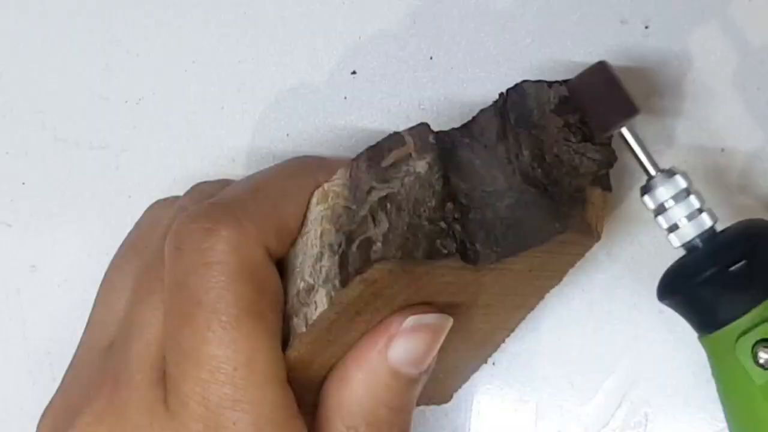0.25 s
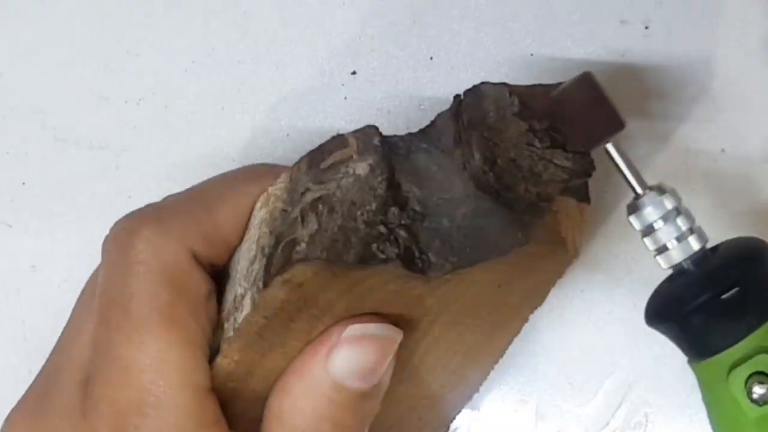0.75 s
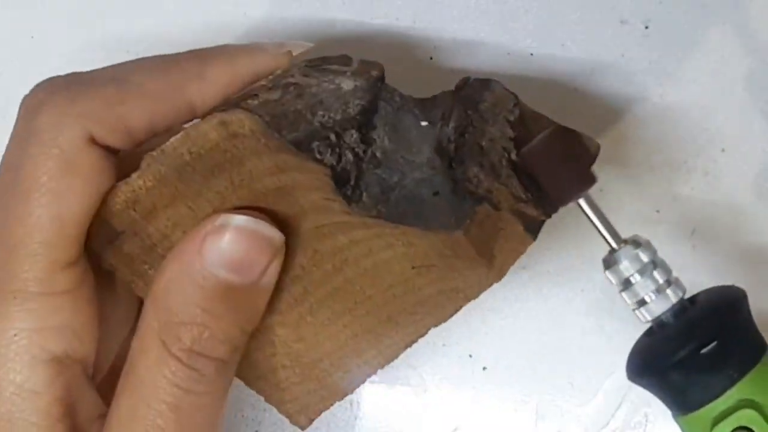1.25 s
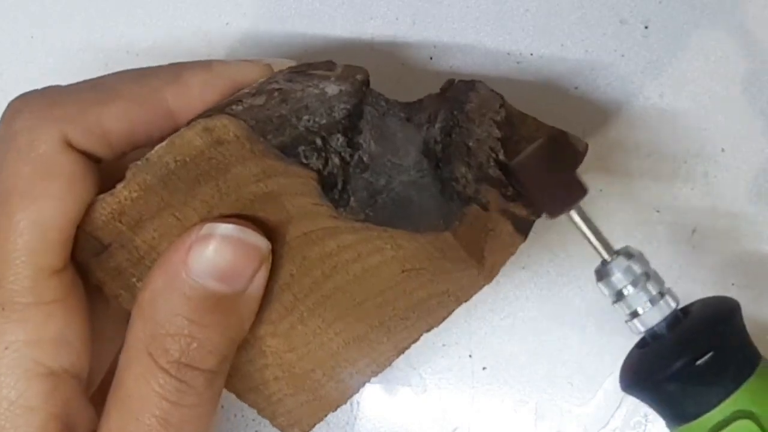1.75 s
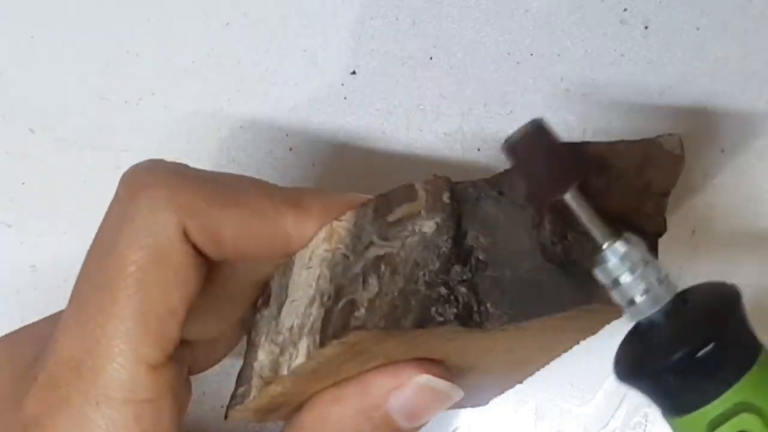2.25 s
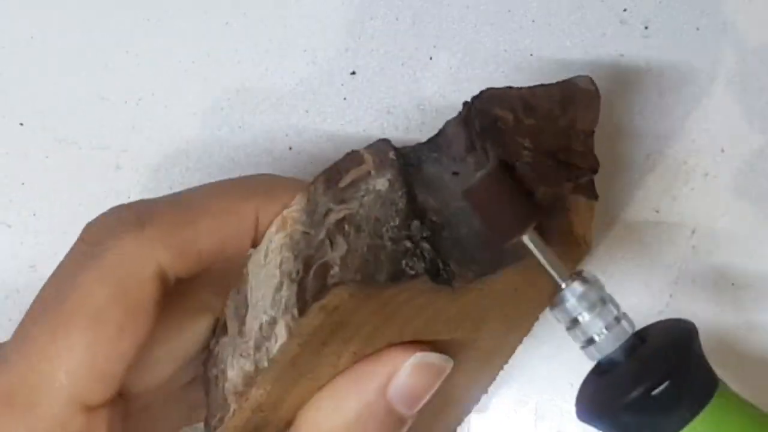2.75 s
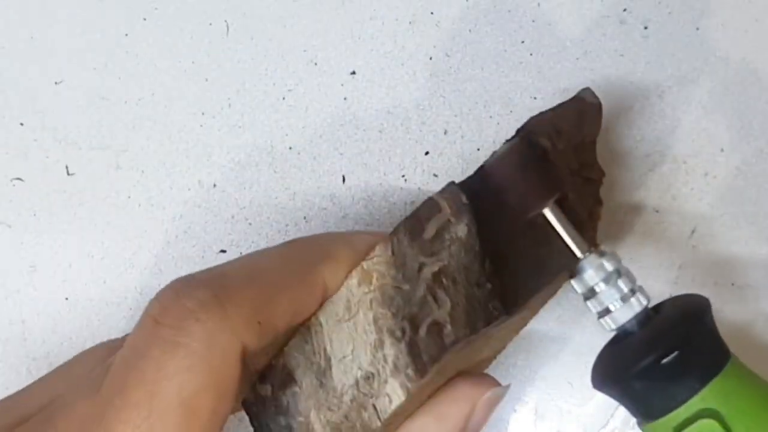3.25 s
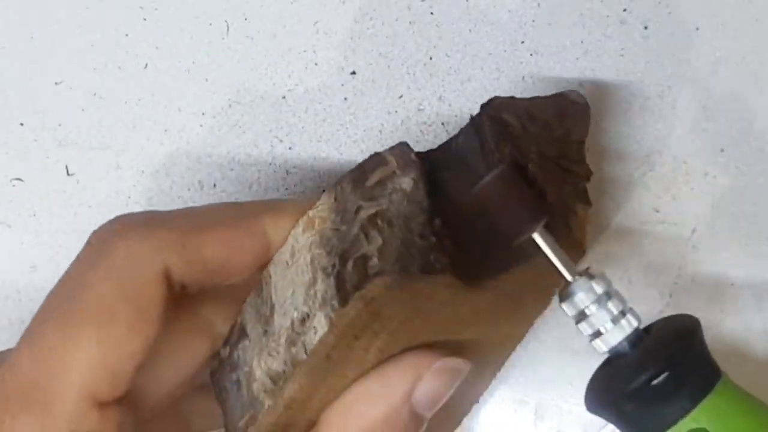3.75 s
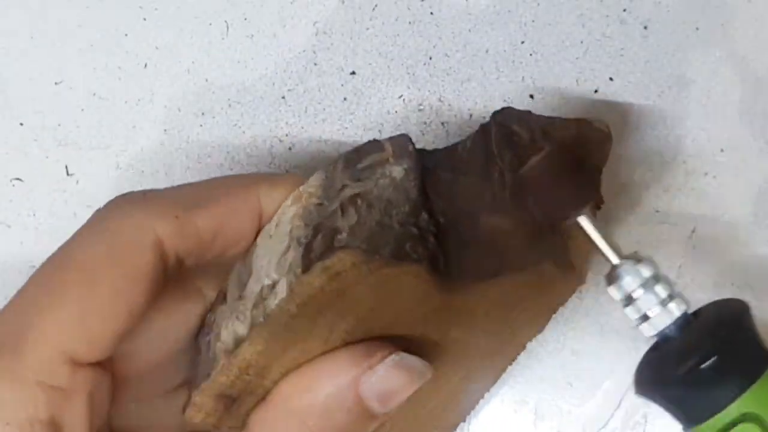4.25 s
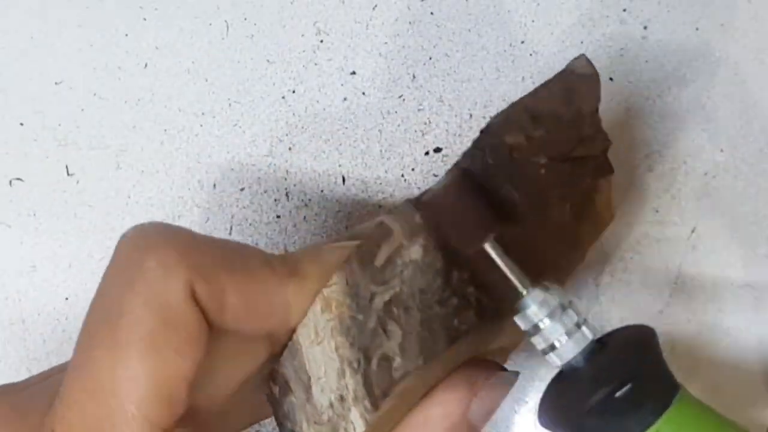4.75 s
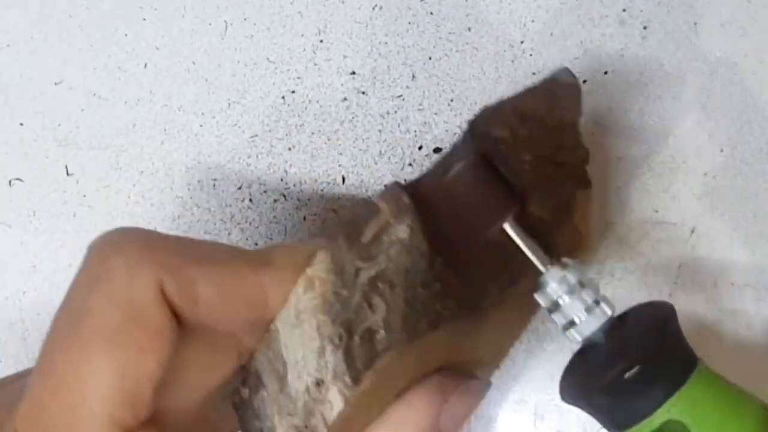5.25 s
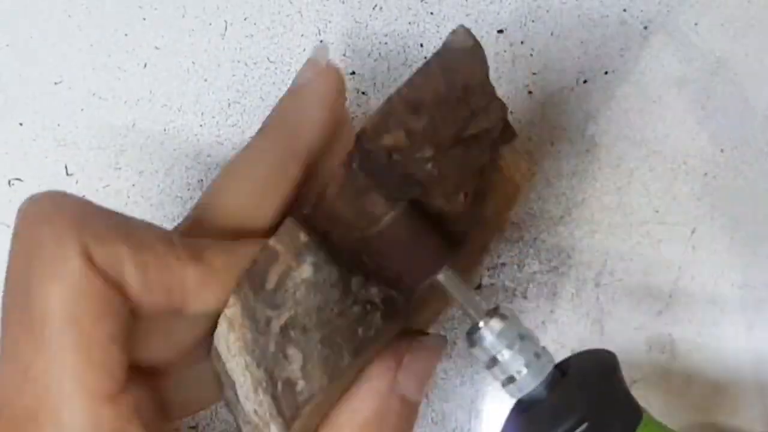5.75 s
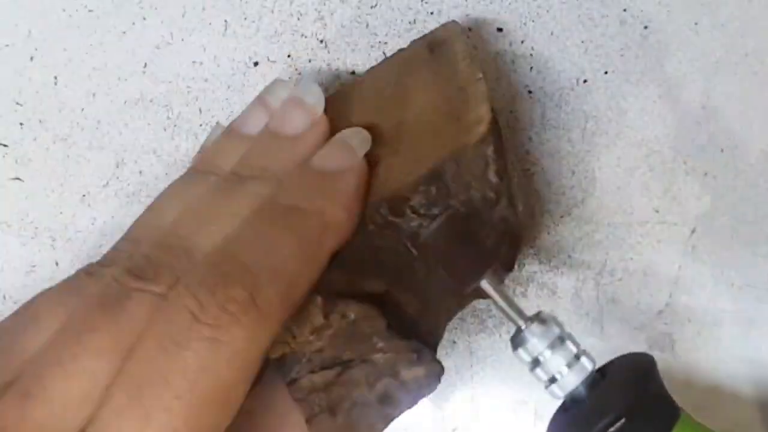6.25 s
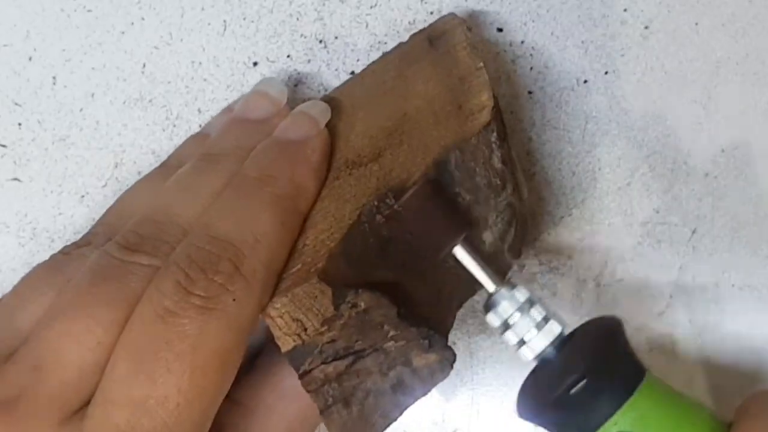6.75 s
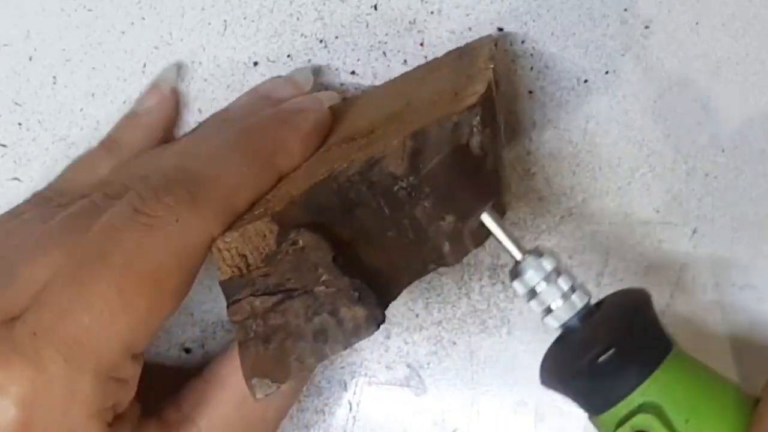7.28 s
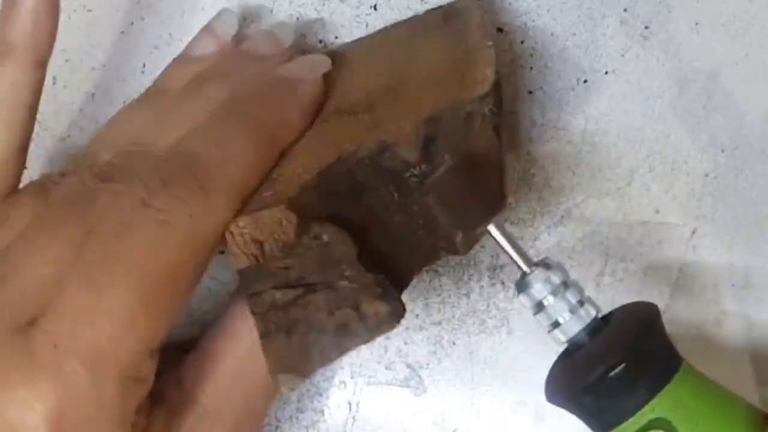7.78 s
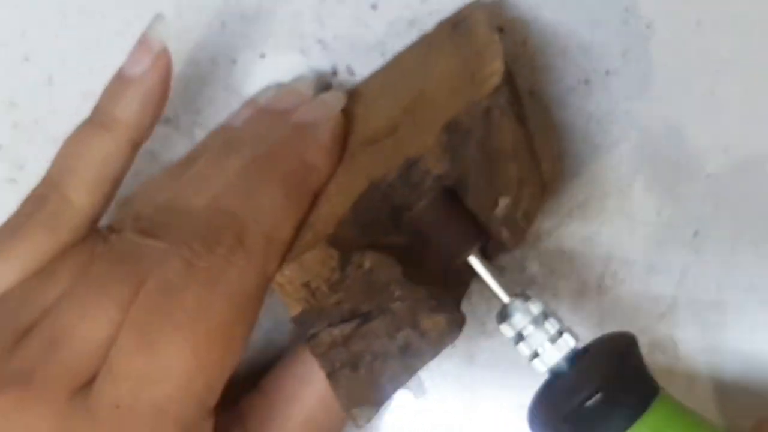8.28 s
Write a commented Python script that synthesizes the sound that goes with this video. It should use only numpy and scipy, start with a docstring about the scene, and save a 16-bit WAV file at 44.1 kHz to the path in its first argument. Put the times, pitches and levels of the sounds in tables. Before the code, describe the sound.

Silence until about 0.28 s, then a handheld rotary tool cuts in abruptly, already spinning and sanding a wood block close to a stereo microphone in a quiet room. A steady midrange hum near 560 Hz carries stacked harmonics, a buzzing chatter three times higher and a piercing whine near 10 kHz, over dry woody rasp and fine hiss. Pitch sags slightly under pressure. Quick skips break the chatter around 1.0-1.7 s, with tiny squeaks near 1.1-1.5. A rough buzz scrapes at 2.9, and stutters cluster from 3.0 to 3.7. Small high squeaks come at 3.9-4.2, then a brief dip at 4.3. Heavier grinding flutters from 4.5 to 5.5. Pressure eases around 5.6-6.4, the hum clearer and slightly higher. From 6.6 it bites again, with faint low block rumble and more skips, sagging lowest at 8.5 s, still running.

```python
"""A handheld rotary tool grinds wood with a small sanding drum, close to the microphone in a quiet room.
Lines locked to the shaft make its hum, which sags under load, the bearing's song and the motor's high whine.
The drum chatters three times a turn, skips off the wood in bouts, and rasps as noise surging once a turn.
It squeaks and buzzes where the grain catches it; the held block rings and rumbles over a low room murmur."""
import sys
import numpy as np
from scipy import signal
from scipy.fft import rfft, irfft
from scipy.io import wavfile
from scipy.ndimage import uniform_filter1d, map_coordinates

SR = 44100
rng = np.random.default_rng(int(sys.argv[2]) if len(sys.argv) > 2 else 0)


def file_out(sig):
    """Save sig as 16-bit WAV at sys.argv[1]."""
    # one column per channel
    cols = np.atleast_2d(sig).T
    # limit, then scale
    lim = np.clip(cols, -1, 1)
    pcm = np.round(lim * 32767).astype(np.int16)
    wavfile.write(sys.argv[1], SR, pcm)


N = 375732
TIME = np.arange(N) / SR  # s
BINS = np.fft.rfftfreq(N, 1 / SR)  # Hz
FREE_HZ, LOADED_HZ = 574, 569  # shaft speeds where load begins and is full


# Shaft speed under changing pressure: time_s [s], speed_hz [turns/s]
SHAFT_SPEED = [(0.3, 570.8), (0.82, 555.0), (1.25, 563.8), (1.67, 553.8), (1.78, 566.5), (2.08, 562.0),
               (2.32, 567.6), (2.67, 556.5), (2.83, 568.1), (2.98, 560.0), (3.21, 561.8), (3.72, 552.8),
               (4.26, 556.5), (4.29, 549), (4.32, 558), (4.38, 565.8), (4.8, 549.0), (5.47, 552.4),
               (5.59, 566.9), (5.96, 573.6), (6.47, 569.4), (6.71, 555.4), (7.02, 552.4), (7.77, 558.4),
               (7.87, 567.9), (8.11, 551.4), (8.5, 542.7)]
RACE_HZ, RACE_SETTLE_S = 3.3, 0.082  # scale of the speed change, averaging window


def shaft(lifted):
    """Torque balance: pressure slows the shaft, and it races a little where the drum is lifted."""
    speed, = follow(SHAFT_SPEED)
    load = np.clip((FREE_HZ - speed) / max(FREE_HZ - LOADED_HZ, 1), 0, 1)
    # subtracting the local mean leaves the shaft slightly slower on both sides of a skip
    race = lifted - uniform_filter1d(lifted, max(round(RACE_SETTLE_S * SR), 1))
    turns = np.cumsum(speed + RACE_HZ * race + 0.696 * wander(15.0)) / SR
    return turns, speed, load


# Level curves of the shaft harmonics at orders 1, 2 and 4: time_s [s], level_db [dB, nominal]
HUM = [(0.3, -36.5), (0.54, -42), (1.42, -40), (1.48, -44), (1.82, -38.5), (2.02, -41.5), (2.82, -37.5),
       (3.26, -37.5), (4.26, -42), (4.34, -39.5), (4.9, -38.5), (5.02, -41.6), (5.5, -40), (5.66, -36),
       (5.88, -33), (5.98, -38.5), (6.22, -32), (6.95, -38), (7.03, -37.5), (7.13, -41), (7.18, -35),
       (7.33, -44.5), (7.44, -37.5), (7.82, -35.5), (7.98, -35), (8.07, -43), (8.16, -43), (8.38, -33.5),
       (8.46, -42), (8.5, -51)]
SECOND = [(0.3, -42.5), (0.5, -40.5), (1.02, -48.5), (1.24, -45), (1.4, -51), (1.98, -41), (2.58, -46.5),
          (2.82, -46), (3.72, -49), (4.14, -43), (4.3, -44), (4.38, -43), (4.74, -47.5), (5.1, -44.5),
          (5.5, -47), (5.84, -44), (6.0, -38), (6.54, -38.5), (6.64, -44.5), (7.04, -53), (7.34, -41),
          (7.9, -41), (8.16, -52.5), (8.38, -39.5), (8.5, -51)]
FOURTH = [(0.3, -41.5), (0.85, -48), (1.18, -42.5), (1.65, -43.5), (1.96, -37), (2.2, -41), (2.45, -38),
          (2.66, -45), (2.8, -40), (3.1, -43.5), (3.7, -49.5), (4.05, -43.5), (4.28, -44.5), (4.4, -37.5),
          (4.8, -55), (5.5, -52), (5.58, -38), (5.9, -33.5), (6.44, -41.5), (6.64, -52), (6.84, -44),
          (7.55, -38), (7.85, -42), (8.5, -53)]
# The same at orders 5, 8 and 9: time_s [s], level_db [dB, nominal]
FIFTH = [(.3, -55), (.6, -50), (1.3, -54), (1.8, -52), (1.98, -46), (2.2, -52.5), (5.4, -53), (6.0, -44),
         (6.8, -50), (7.9, -49.5), (8.5, -56)]
EIGHTH = [(.3, -43), (.95, -46), (1.08, -58), (1.4, -47), (1.7, -56), (4.4, -57), (4.9, -50), (5.3, -55),
          (5.85, -47.5), (6.3, -55), (6.7, -48), (7.1, -53), (8.2, -54), (8.35, -46), (8.5, -57)]
NINTH = [(.3, -50), (.55, -49.5), (1.2, -56), (2.8, -55.5), (3.3, -51), (3.6, -60), (4.8, -55), (5.2, -61),
         (6.04, -51.5), (7.9, -52.5), (8.5, -61)]
# Weaker shaft harmonics: order [lines per turn], level_db [dB, nominal]
OVERTONES = [(6, -54), (7, -53), (10, -56.5), (11, -57.5), (12, -58), (13, -54), (17, -56), (19, -58),
             (20, -57), (21, -56)]
# Bearing tones and sidebands: order [cycles per turn], free_db [dB, nominal], loaded_db [dB, nominal]
BEARING = [(2.58, -60, -47), (2.82, -68, -57), (3.58, -51, -59), (4.16, -68, -55), (4.58, -54, -54.5),
           (5.58, -54, -57.5), (6.16, -51, -59), (6.58, -60, -55.5), (7.43, -58, -57), (7.58, -57, -60)]
SWELL_DB_PER_ORDER, SWELL_MAX_DB = 0.35, 2.6
DRIFT_PER_ORDER, DRIFT_MAX = 0.074, 0.78  # radians
DIP_S, DIP_LENGTH_S, DIP_DB = 4.285, 0.044, -8  # these tones dip briefly


def motor(turns, load):
    """Rotating unbalance gives a hum and harmonics, bearing tones lie between; contact makes them tremble."""
    tremble_db = 1 + 3.86 * load
    shaken = turns + .008 * load * wander(15)
    hum_db = follow(HUM)[0] + 0.22 * tremble_db * wander(27.3)
    out = tone(shaken, 1, hum_db, drift=0.088)
    for order, curve in (2, SECOND), (4, FOURTH), (5, FIFTH), (8, EIGHTH), (9, NINTH):
        level_db = follow(curve)[0] + 0.45 * tremble_db * wander(20) - .3
        out += tone(turns, order, level_db, drift=.05 * order)
    bearing = [(order, free_db + (loaded_db - free_db) * load) for order, free_db, loaded_db in BEARING]
    for order, level_db in OVERTONES + bearing:
        slow_depth_db = min(SWELL_DB_PER_ORDER * order, SWELL_MAX_DB)
        swell_db = 2.6 * wander(30) + slow_depth_db * wander(2.9) - 2
        out += tone(turns, order, level_db + swell_db, drift=min(DRIFT_PER_ORDER * order, DRIFT_MAX))
    return out * amp(DIP_DB * bump(TIME, DIP_S, DIP_LENGTH_S))


# Level curve of the high motor whine: time_s [s], level_db [dB, nominal]
WHINE = [(0.3, -35), (0.46, -42), (0.66, -46), (0.78, -49), (1.06, -36.5), (1.18, -48), (1.66, -39.5),
         (1.74, -41.5), (2.42, -36), (3.18, -46), (3.34, -43), (3.54, -47.5), (4.34, -42), (4.46, -50),
         (4.7, -43), (5.18, -35.5), (5.42, -43), (5.74, -36), (6.06, -46), (6.3, -39.5), (6.74, -43),
         (7.26, -40), (7.62, -53), (7.82, -41), (8.02, -43), (8.5, -45)]
WHINE_ORDER = 18  # cycles per turn
FLIP_HZ, FLIP_WIDTH_HZ, FLIP_RADIANS = 558.5, 4, 2.3  # shaft speed, half-width, added phase lead


def whine(turns, speed, load):
    """Shaft-locked line: flickers more under load, and near one speed reaches the ports out of step."""
    flicker_db = (0.47 + 2.2 * load) * np.tanh(wander(31, centre_hz=23.4))
    swing_db = 7.6 * np.tanh(0.52 * wander(19))
    lead = FLIP_RADIANS * bump(speed, FLIP_HZ, 2 * FLIP_WIDTH_HZ)
    level_db = follow(WHINE)[0] + flicker_db + swing_db - 1.1
    return tone(turns, WHINE_ORDER, level_db, drift=0.77, lead=lead)


# Moments when the drum skips off the wood: middle_s [s], length_s [s]
SKIPS = [(1.023, .05), (1.133, .014), (1.299, .019), (1.344, .021), (1.4, .03), (1.64, .04), (2.997, .025),
         (3.041, .018), (3.21, .012), (3.301, .012), (3.353, .019), (3.401, .02), (3.443, .022),
         (3.48, .017), (3.601, .016), (3.656, .016), (3.704, .018), (4.359, .022), (4.415, .025),
         (4.558, .012), (4.915, .026), (4.974, .016), (5.0, .011), (5.075, .012), (5.166, .014),
         (5.242, .018), (5.312, .024), (5.361, .02), (5.425, .012), (5.476, .019), (5.624, .018),
         (5.806, .014), (6.447, .024), (6.52, .022), (7.244, .02), (7.357, .018), (7.4, .019), (7.8, .03),
         (7.845, .022), (8.212, .028), (8.289, .029), (8.33, .016), (8.404, .013)]
SKIP_DB, SKIP_EDGE = -19, 2.0  # limit of the drop, steepness of its saturation


def skipping():
    """Intermittent contact: the chatter drops abruptly, with saturation squaring off each drop."""
    skip_db = SKIP_DB * np.tanh(SKIP_EDGE * sum(bump(TIME, s, length) for s, length in SKIPS))
    return skip_db, 1 - amp(skip_db)


# Level curve of the drum's knocking on the wood: time_s [s], level_db [dB, nominal]
CHATTER = [(0.3, -43.5), (0.62, -40.5), (0.76, -33.5), (0.97, -36), (1.05, -40.5), (1.36, -38), (1.48, -35),
           (1.68, -41.5), (2.35, -46.5), (2.6, -41), (2.69, -46), (2.94, -37.5), (3.19, -47), (3.39, -36.5),
           (3.58, -38), (3.68, -45), (3.75, -40.5), (4.24, -39.5), (4.35, -46), (4.5, -37.5), (4.83, -35),
           (5.09, -40), (5.34, -39), (5.46, -45), (6.4, -43.5), (6.95, -36.5), (7.32, -38), (7.4, -42),
           (7.83, -43.5), (8.0, -37.5), (8.5, -38.5)]
REBOUND_DB, REBOUND_S = 4.5, .09  # gain per lifted fraction, averaging window centred on the skip


def chatter(turns, load, skip_db, lifted):
    """Periodic impact three times a turn: it breaks at every skip and is stronger on either side."""
    stutter_db = load * (1.25 * wander(25) + 0.5 * wander(30, centre_hz=102))
    slip = 0.01 * load * wander(30)
    rebound_db = REBOUND_DB * uniform_filter1d(lifted, round(REBOUND_S * SR))
    level_db = follow(CHATTER)[0] + stutter_db + skip_db + rebound_db - .2
    return tone(turns + slip, 3, level_db, drift=0.41)


# Grinding levels, woody body and rasp: time_s [s], body_db [dB, nominal], rasp_db [dB, nominal]
CUT = [(.3, -46.5, -45), (.7, -47, -44.5), (1.18, -44.5, -43.5), (1.42, -44, -42.5), (1.5, -45.5, -43.5),
       (2.42, -45, -43), (2.74, -45.5, -42.5), (2.86, -46, -43.5), (3.54, -45, -43), (3.66, -45, -44.5),
       (4.3, -46.5, -45.5), (5.14, -44.5, -44), (5.42, -44.5, -44), (5.74, -46.5, -43), (6.26, -47.5, -42),
       (6.62, -46.5, -44.5), (7.66, -45.5, -42), (8.5, -44, -44)]
# Relative spectra of woody body, rasp and fine grit hiss: frequency_hz [Hz], density_db [dB per Hz]
BODY = [(400, -29), (600, -23), (675, -13.5), (735, -8.5), (820, 0), (880, -1.5), (1020, -1.5), (1200, -6),
        (1340, 1), (1480, 3), (1560, -0.5), (1950, 3.5), (2250, -0.5), (2700, -14), (5000, -48)]
RASP = [(1000, -49), (1950, -14), (2400, 2), (2700, 1.5), (2950, 0.5), (3500, -1), (4300, 2), (4800, -1),
        (5400, -2), (6000, 2.5), (6500, -5.5), (7400, -2.5), (8600, -8), (10000, -6), (13000, -53)]
GRIT = [(6000, -49), (8600, -38), (9600, -4), (10800, 2.5), (12000, 5.5), (14000, 3.5), (15800, 2.5),
        (17000, -46)]
GRIT_DB = -44  # nominal level of the fine hiss
SURGE_RASP_DB, SURGE_GRIT_DB = 1.7, 2.4  # depth of the once-a-turn surge
REPEAT_SHARE = .22  # of the previous turn's noise at full load


def grinding(turns, speed, load):
    """Abrasion noise modulated by rotation: one surge a turn, with coarse and fine grains clumping apart."""
    contact = np.cos(2 * np.pi * (turns + 0.21 * load * wander(32)))
    coarse_db = .9 * wander(40) + 1.1 * wander(300)
    fine_db = .8 * wander(40) + .4 * wander(300)
    body_db, rasp_db = follow(CUT)
    coarse = noise(BODY) * amp(body_db) + noise(RASP) * amp(rasp_db)
    rasp = coarse * unit(amp(SURGE_RASP_DB * contact + coarse_db)) * amp(0.41 * wander(6.0))
    fine_surge = unit(amp(SURGE_GRIT_DB * contact + fine_db))
    grit = noise(GRIT) * fine_surge * amp(GRIT_DB + .7 * wander(22))
    return repeated(rasp + grit, speed, share=REPEAT_SHARE * (.5 + .5 * load))


def repeated(x, speed, share):
    """Cyclic correlation: the same grit meets the wood one turn later, so part of the noise repeats."""
    earlier = np.arange(N) - SR / speed
    echo = np.array([map_coordinates(channel, [earlier], order=3) for channel in x])
    return (x + share * echo) / np.sqrt(1 + share ** 2)


# Crossings of rough grain: middle_s [s], length_s [s], level_db [dB of each harmonic, nominal]
ROUGH_GRAIN = [(2.865, 0.29, -49), (3.92, 0.96, -59)]
SCRAPE_ORDERS = range(21, 29)
SCRAPES_PER_S, SCRAPE_DEPTH_DB, SCRAPE_SCATTER_DB = 24, 4, 2  # rate of the random bursts, their depths


def scraping(turns):
    """Repeated stick and slip on rough grain: uneven bursts of high shaft harmonics buzz."""
    crossing = sum(amp(level_db) * bump(TIME, s, length) for s, length, level_db in ROUGH_GRAIN)
    bursts = unit(amp(SCRAPE_DEPTH_DB * np.tanh(wander(SCRAPES_PER_S))))
    uneven = turns + 0.0044 * wander(250)
    buzz = np.zeros((2, N))
    for order in SCRAPE_ORDERS:
        buzz += tone(uneven, order, SCRAPE_SCATTER_DB * np.tanh(wander(SCRAPES_PER_S)))
    return crossing * bursts * buzz


# Squeaks on the grain: middle_s [s], length_s [s], order [cycles per turn], level_db [dB, nominal]
SQUEAKS = [(.32, 0.032, 21.5, -40), (1.135, 0.016, 21.5, -36), (1.345, 0.019, 7.5, -34),
           (1.346, .022, 21.5, -38), (1.394, .032, 7.5, -34), (1.42, .016, 7.5, -43),
           (1.4, .037, 21.5, -39), (1.441, 0.025, 8, -42), (1.459, .026, 7, -45), (3.852, .013, 27, -35),
           (3.94, .016, 27, -43), (4.038, .014, 28, -40), (4.13, .019, 28, -39), (4.18, .02, 27, -42)]


def squeaks(turns):
    """Stick-slip friction: the drum catches on the grain and squeaks for a moment."""
    return catches(SQUEAKS, turns, throb=0.55, rough=0.002, fuzz=.3, width_hz=700)


# Block rings under the drum: middle_s [s], length_s [s], order [cycles per turn], level_db [dB, nominal]
RESONANCES = [(.47, 0.12, 11, -50), (4.12, 0.2, 7, -51.5), (5.7, 0.097, .5, -67), (6.21, 0.11, .5, -65.5)]


def resonances(turns):
    """Resonance: the block rings where the drum touches it, with little throb and a narrow blur."""
    return catches(RESONANCES, turns, throb=0.064, rough=0.0028, fuzz=.3, width_hz=60)


def catches(table, turns, throb, rough, fuzz, width_hz):
    """Amplitude modulation of short rings: a throb once a turn and a fuzzy narrow-band share."""
    out = np.zeros((2, N))
    uneven = turns + rough * wander(250)
    grain = rng.standard_normal(N) + 1j * rng.standard_normal(N)
    lowpass = signal.butter(2, width_hz / 2, fs=SR, output="sos")
    blur = unit(signal.sosfilt(lowpass, grain))
    strength = (1 + fuzz * blur) / np.sqrt(1 + fuzz ** 2)
    strength = strength * (1 + throb * np.cos(2 * np.pi * turns))
    for s, length, order, level_db in table:
        near = abs(TIME - s) < 2 * length
        swell = amp(level_db) * bump(TIME[near], s, length)
        ring = np.exp(2j * np.pi * order * uneven[near]) * strength[near]
        out[:, near] += np.sqrt(2) * swell * (port_pair(-4.4, 1.0) * ring).real
    return out


# Level curve of the held block's rumble: time_s [s], level_db [dB, nominal]
BLOCK = [(.3, -74), (4, -71.5), (5.2, -78), (6.2, -69), (6.6, -59.5), (7.2, -56.5), (7.5, -72), (8, -59),
         (8.4, -57)]
# Relative spectra of the block's rumble and the room: frequency_hz [Hz], density_db [dB per Hz]
RUMBLE = [(25, -26), (70, -9), (120, -0.5), (160, -13), (205, 4.5), (245, -8), (290, -6.5), (350, 0),
          (480, 0.5), (600, 8), (700, -0.5), (1200, -36)]
ROOM = [(20, -25), (40, -8), (65, -4), (110, 3), (160, -4), (300, -41), (1000, -40)]


def background():
    """Broadband low-frequency noise: the held block rumbles over the steady murmur of the room."""
    block = noise(RUMBLE) * amp(follow(BLOCK)[0] + 2 * wander(16))
    return block + noise(ROOM) * amp(-77.0)


# Paths of strong lines: order [cycles per turn] -> lean_db [dB, left minus right], lead [rad, left leads]
PATHS = {1: (-.7, 0.), 2: (-2.2, -1.45), 3: (-3, .1), 4: (-7.5, -1.55), 5: (-3, -1.1), 7: (-2.5, -1.2),
         8: (-2.5, -1.5), 2.58: (-2.5, -1.4), 18: (-5.5, 0.)}


def tone(turns, order, level_db, drift=0.21, lead=0):
    """Order-locked line: moving hands shift its reflections differently at each port."""
    phase = (2 * np.pi * ((order * turns + rng.random()) % 1)).astype(np.float32)
    paths = port_pair(*PATHS[order]) if order in PATHS else ports(np.array([order * LOADED_HZ]))
    sway = (drift * wander(3.7) + lead / 2) * np.array([[1], [-1]])
    wave = abs(paths) * np.cos(phase + (np.angle(paths) + sway).astype(np.float32))
    return np.sqrt(2) * amp(level_db) * wave


# Left-right likeness of the noise: frequency_hz [Hz], likeness [0 to 1]
LIKENESS = [(60, .78), (400, .78), (900, .8), (2000, .6), (4000, .45), (8000, .66), (12000, .8),
            (16000, .8)]


def noise(spectrum):
    """Partial coherence: coloured noise shared between two ports, with a mid level of rms 1."""
    a, b = rfft(rng.standard_normal((2, N)))
    same = np.clip(at(LIKENESS, BINS), 0, 1)
    pair = np.array([a, same * a + np.sqrt(1 - same ** 2) * b]) * ports(BINS)
    x = irfft(pair * amp(at(spectrum, BINS)), N)
    return x / x.mean(0).std()


# Level difference of the ports: frequency_hz [Hz], lean_db [dB, left minus right]
LEAN = [(60, -2.5), (300, -2.5), (750, 0.5), (1250, 2), (2000, -3.5), (3500, -2.5), (7000, -2), (9500, -3),
        (15000, -8)]
# Phase difference of the ports: frequency_hz [Hz], lead [rad, left leads]
LEAD = [(0, 0), (690, 0.5), (1210, -1), (1980, 1.5), (2240, -1.24), (2840, -2.5), (3530, -0.57), (4130, -3),
        (5340, -0.56), (7060, -6.5), (7670, -6), (16500, -6)]


def ports(hz):
    """Interaural-style differences: complex gains of the left and right microphone ports."""
    return port_pair(at(LEAN, hz), at(LEAD, hz))


def port_pair(lean_db, lead):
    """Power conservation: two complex gains of mean power 1 with a given level and phase difference."""
    half = amp(lean_db / 2) * np.exp(.5j * lead)
    pair = np.array([half, 1 / half]).reshape(2, -1)
    return pair / np.sqrt(np.mean(abs(pair) ** 2, axis=0))


def wander(rate_hz, centre_hz=0):
    """Random modulation: smooth chance of rms 1, its spectrum falling to half rate_hz from centre_hz."""
    size = 8192
    f = np.fft.rfftfreq(size, N / SR / size)
    slow = irfft(rfft(rng.standard_normal(size)) / (1 + ((f - centre_hz) / rate_hz) ** 2))
    return np.interp(np.arange(N), np.linspace(0, N, size), unit(slow))


def bump(x, centre, width):
    """Gaussian envelope: height 1 at the centre, width measured across the 1/e points."""
    return np.exp(-(2 * (x - centre) / width) ** 2)


def amp(db):
    """Logarithmic level: decibels to gain."""
    return 10 ** (np.asarray(db) / 20)


def unit(x):
    """Power normalisation: scales to rms 1."""
    return x / np.sqrt(np.mean(abs(x) ** 2) + 1e-20)


def follow(table):
    """Linear interpolation: each column of a time table at every sample."""
    s, *columns = np.transpose(table)
    return [np.interp(TIME, s, column) for column in columns]


def at(points, hz):
    """Logarithmic pitch scale: reads a spectrum on a log-frequency axis."""
    f, value = np.transpose(points)
    return np.interp(np.log(hz + 1), np.log(f + 1), value)


def scene():
    """Superposition: tool, wood and background add, with shaft and skips driving the sources."""
    skip_db, lifted = skipping()
    turns, speed, load = shaft(lifted)
    tool = motor(turns, load) + whine(turns, speed, load)
    wood = chatter(turns, load, skip_db, lifted) + grinding(turns, speed, load)
    wood += scraping(turns) + squeaks(turns) + resonances(turns)
    return tool + wood + background()


START = 0.2803  # s
EDGE_HZ = 16000


def record(dry):
    """Gating and band limiting: the sound opens abruptly out of silence, then passes a low-pass."""
    opened = dry * np.clip((TIME - START) / 0.0013 + .5, 0, 1)
    lowpass = signal.firwin(511, EDGE_HZ, window=("kaiser", 9), fs=SR)
    return signal.oaconvolve(opened, lowpass[None], "same")


dry = scene()
out = record(dry)
file_out(out)
```